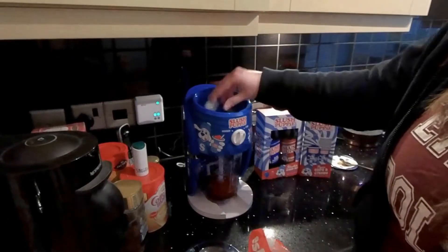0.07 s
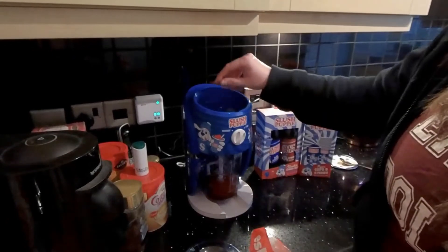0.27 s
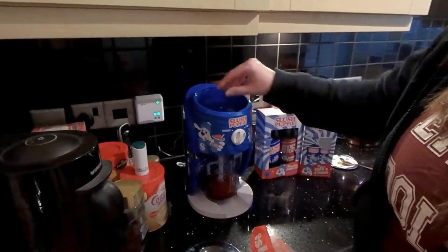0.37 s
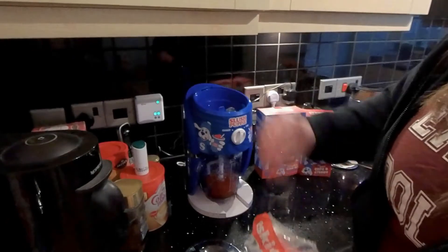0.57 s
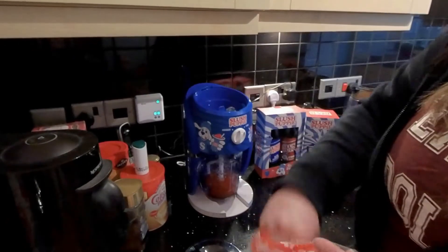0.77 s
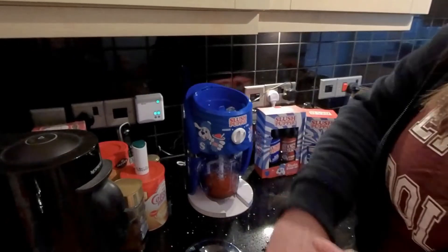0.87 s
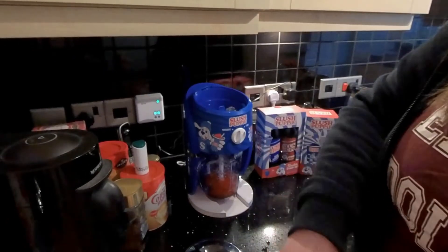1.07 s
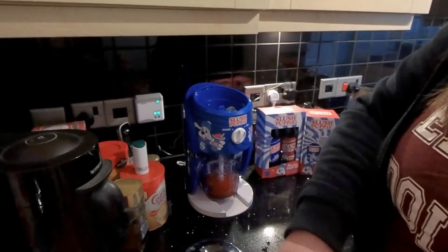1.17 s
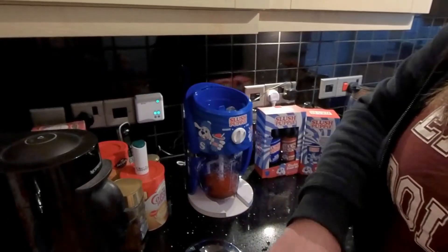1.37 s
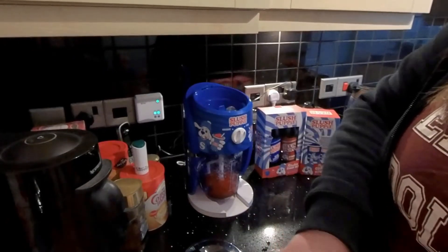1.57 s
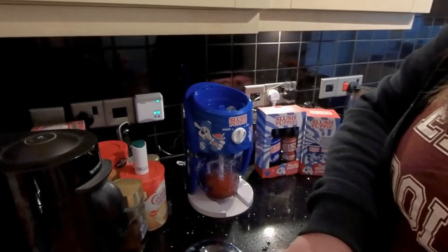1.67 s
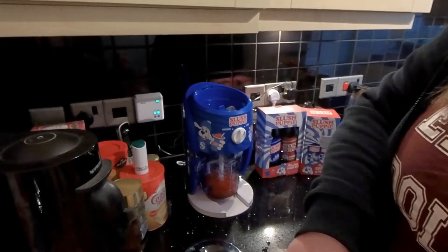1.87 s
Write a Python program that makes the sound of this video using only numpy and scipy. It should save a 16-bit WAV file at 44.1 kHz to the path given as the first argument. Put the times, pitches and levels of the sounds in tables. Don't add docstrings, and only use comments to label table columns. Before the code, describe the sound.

Ice: faint finger ticks, one loud hard rattling drop into a plastic slush maker, a brief near-silence, then crinkly bag rustle with cubes grinding and snapping over dull counter thumps, heard close in a small reflective kitchen.

```python
import sys
import numpy as np
from scipy import signal
from scipy.fft import rfft, irfft, next_fast_len
from scipy.io import wavfile

SR = 44100
rng = np.random.default_rng(int(sys.argv[2]) if len(sys.argv) > 2 else 0)


def master(y):
    cut = np.clip(np.atleast_2d(y).T, -1, 1)
    pcm = np.round(cut * 32767)
    wavfile.write(sys.argv[1], SR, pcm.astype(np.int16))


def elevation(decibels):
    levels = np.asarray(decibels, float)
    return 10 ** (levels / 20)


N = 83790
TIME_S = np.arange(N) / SR
EDGES_HZ = 40 * 2 ** np.arange(0, 9.2, .5)

# start_s, effort_db, cube_weight_db
DIG = [(0.70, -58.5, -64), (0.781, -73.5, -20), (0.79, -57, -19), (0.828, -81, -6.5), (0.847, -45.5, -7),
       (0.905, -42.5, -19), (0.973, -43, -17), (1.002, -41, -12.5), (1.323, -43, -14.5), (1.35, -57, -22),
       (1.376, -38.5, -17), (1.412, -52.5, -7.5), (1.52, -51.5, -14), (1.63, -44.5, -6.5),
       (1.70, -48, -20.5), (1.799, -59.5, -23), (1.864, -42, -6.5), (1.9, -45.5, -9)]
# pitch_hz, level_db, t60_s
WORKTOP = [(194.2, -4, 0.05), (234, -4.5, 0.033), (313, -8.5, 0.013), (350, -3, 0.039), (705, -9, 0.071),
           (864, -6.5, 0.025)]


def rms_one(x):
    return x / np.sqrt(np.mean(x ** 2) + 1e-30)


def at_hz(points, hz):
    point_hz, value = np.transpose(points)
    return np.interp(np.log(hz), np.log(point_hz), value)


def colour(x, points, power=1):
    size = next_fast_len(x.shape[-1] + SR // 10)
    hz = np.maximum(np.fft.rfftfreq(size, 1 / SR), 1)
    spectrum = rfft(x, size) * elevation(power * at_hz(points, hz))
    return irfft(spectrum, size)[..., :x.shape[-1]]


def drift(rate_hz):
    r = np.exp(-80 * np.pi * rate_hz / SR)
    slow = signal.lfilter([1], [1, -2 * r, r * r], rng.standard_normal(N // 40 + 2002))
    slow = rms_one(slow[2000:])
    return np.interp(np.arange(N) / 40, np.arange(len(slow)), slow)


def band(x, k):
    sos = signal.butter(2, EDGES_HZ[k:k + 2], "band", fs=SR, output="sos")
    return signal.sosfilt(sos, x), np.sqrt(EDGES_HZ[k] * EDGES_HZ[k + 1])


def clicks(start_s, gains):
    out = np.full(N, 1e-18)
    index = np.minimum((np.asarray(start_s) * SR).astype(int), N - 1)
    np.add.at(out, index, gains)
    return out


def ring(x, hz, t60_s):
    r, w = elevation(-60 / (t60_s * SR)), 2 * np.pi * hz / SR
    return signal.lfilter([0, np.sin(w)], [1, -2 * r * np.cos(w), r * r], x)


def bursts(start_s, level_db, t60_s, spectrum):
    rise_s, grit_db = .001, 0.5
    envelope = signal.lfilter([1], [1, -elevation(-60 / (t60_s * SR))], clicks(start_s, elevation(level_db)))
    r = np.exp(-1 / (rise_s * SR))
    envelope = signal.lfilter([1 - r], [1, -r], envelope)
    grit = rng.standard_normal(N) * elevation(grit_db * drift(180))
    return envelope * rms_one(colour(grit, spectrum))


def place(x, pan, wet_db, lag_s):
    # pitch_hz, t60_s
    kitchen = [(100, 0.17), (300, 0.19), (750, 0.33), (1400, 0.29), (2100, 0.35), (5000, 0.41),
               (12000, 0.25)]
    # pitch_hz, likeness (-1 to 1)
    likeness = [(100, .1), (500, .6), (2000, .1), (4500, -.4), (9000, .5)]
    first_echo_s, build_s = 0.00046, 0.00092
    t = np.arange(int(.7 * SR)) / SR
    white = rng.standard_normal((2, 2, len(t)))
    tail = 0
    for k in range(len(EDGES_HZ) - 1):
        (mid, side), hz = band(white[k % 2], k)
        alike = np.clip(at_hz(likeness, hz), -.95, .95)
        pair = np.sqrt(1 + alike) * mid + np.sqrt(1 - alike) * side * [[1], [-1]]
        tail = tail + elevation(-60 * t / at_hz(kitchen, hz)) * pair
    tail = tail * (1 - np.exp(-np.maximum(t - first_echo_s, 0) / build_s))
    tail *= elevation(wet_db) / np.sqrt(np.sum(tail ** 2) / 2)
    left, right = x + signal.fftconvolve(x[None], tail, axes=1)[:, :N]
    right = np.pad(right, (round(lag_s * SR), 0))[:N]
    return np.array([colour(left, pan, power=.5), colour(right, pan, power=-.5)])


def room_floor():
    # pitch_hz, level_db per Hz
    floor_spectrum = [(60, -35.5), (185, 15.5), (250, -2.5), (340, 0), (492, -14.5), (903, -4),
                      (1250, -13.5), (6140, 0), (16000, -38)]
    hiss = rng.standard_normal((2, N)) + 0.58 * rng.standard_normal(N)
    return elevation(-79) * rms_one(colour(hiss, floor_spectrum))


def ticks():
    # start_s, peak_db
    touches = [(0.0559, -74), (0.107, -39), (0.1105, -47.5), (0.1192, -47), (0.6013, -49.5), (0.683, -75),
               (0.695, -64), (0.704, -51.5), (0.712, -55), (0.724, -46), (0.7354, -58), (0.748, -58)]
    # pitch_hz, level_db per Hz
    tick_spectrum = [(800, -55.5), (1070, -21), (1500, -51.5), (2150, -22), (2500, -32), (3800, -2.5),
                     (5180, -17), (7000, -5), (16000, -27.5)]
    start_s, peak_db = np.transpose(touches)
    return bursts(start_s, peak_db - 8, 0.08, tick_spectrum)


def cube(bounces):
    # pitch_hz, level_db, t60_s
    hopper_modes = [(296, -8, 0.14), (446, -7.5, 0.051), (642, -2, 0.09), (714, -5.5, 0.081),
                    (825, -1, 0.036), (930.5, -9, 0.1995), (1052, -0.5, 0.03), (1150, -9, 0.07),
                    (1228, -8.5, 0.052), (1412, -3.5, 0.032), (1696, -6, 0.017), (2065, 0, .1),
                    (2297, -2, 0.082), (2460, -4.5, 0.15)]
    # pitch_hz, level_db per Hz
    crack_spectrum = [(880, -30.5), (1500, -2.5), (2400, -7), (4000, -4), (6200, -13), (8200, -9),
                      (11500, -16), (16000, -30.5)]
    skid_s, focus_db_per_octave, strike_spread_db = 0.0006, 7, 2.5
    longest_ring_cycles, crack_t60_s = 85, 0.065
    start_s, knock_db, crack_db, focus_hz = np.transpose(bounces)
    luck = rng.standard_normal((len(start_s), len(hopper_modes), 2))
    t = np.arange(400) / SR
    fade = np.exp(-t / skid_s)
    knock = 0
    for k, (hz, level_db, t60_s) in enumerate(hopper_modes):
        skid = rng.standard_normal(len(t)) * fade + 2 * fade * np.sin(2 * np.pi * hz * t)
        skid /= abs(np.sum(skid * np.exp(2j * np.pi * hz * t)))
        strike_db = knock_db + level_db - 12.0 + strike_spread_db * luck[:, k, 0]
        strike_db = strike_db - focus_db_per_octave * abs(np.log2(focus_hz / hz))
        strikes = clicks(start_s, np.sign(luck[:, k, 1]) * elevation(strike_db))
        push = signal.fftconvolve(strikes, skid)[:N]
        knock = knock + ring(push, hz, min(t60_s, longest_ring_cycles / hz))
    return knock + bursts(start_s, crack_db - 10, crack_t60_s, crack_spectrum)


def film():
    # pitch_hz, level_db per Hz
    film_spectrum = [(240, -29.5), (450, -5), (710, -4.5), (1100, -4.5), (1550, -12.5), (2200, -8.5),
                     (5600, -11), (8300, -10), (16000, -20.5)]
    grains_per_s, grain_spread_db, clump_db, patch_db = 1500, 4, 3, 1.3
    cubes_top_hz, cubes_db, film_db = 1870, 6.5, -2.5
    start_s, effort_db, weight_db = np.transpose(DIG)
    effort_db = np.interp(TIME_S, start_s, effort_db, left=-120)
    weight = elevation(cubes_db + np.interp(TIME_S, start_s, weight_db))
    sizes = elevation(grain_spread_db * np.minimum(rng.exponential(1, (2, N)), 5))
    sizes = sizes * rng.choice([-1, 1], (2, N))
    born = rng.random((2, N)) < grains_per_s * elevation(clump_db * drift(30)) / SR
    grains = sizes * born + 1e-18
    crackle = 0
    for k in range(6, len(EDGES_HZ) - 1):
        patches = elevation(patch_db * drift(22.8))
        crackle = crackle + rms_one(band(grains[k % 2], k)[0]) * 2 ** (k / 4) * patches
    crackle = rms_one(colour(crackle, film_spectrum))
    cubes = signal.sosfilt(signal.butter(4, cubes_top_hz, "low", fs=SR, output="sos"), crackle)
    plastic = signal.sosfilt(signal.butter(4, cubes_top_hz, "high", fs=SR, output="sos"), crackle)
    return elevation(effort_db + film_db) * (plastic + weight * cubes)


def rumble():
    rumble_db, patch_db, weight_follow = -14.5, 4, 1.67
    start_s, effort_db, weight_db = np.transpose(DIG)
    drive_db = np.interp(TIME_S, start_s, effort_db + weight_follow * weight_db, left=-120)
    drive = elevation(rumble_db + drive_db)
    out = 0
    for hz, level_db, t60_s in WORKTOP:
        push = drive * elevation(patch_db * drift(29.76)) * rng.standard_normal(N)
        out = out + elevation(level_db) * ring(push, hz, t60_s)
    return out


def thumps():
    # start_s, peak_db, pitch_hz
    pushes = [(0.756, -41.5, 191), (0.76, -49, 350), (0.849, -42.5, 345), (0.993, -41, 414),
              (1.037, -36.5, 350), (1.108, -38, 317), (1.139, -36.5, 358), (1.169, -39, 312),
              (1.207, -45, 212), (1.276, -30.5, 224), (1.309, -71, 210.3), (1.402, -38, 189),
              (1.467, -38.5, 183), (1.534, -40, 350), (1.606, -31, 296), (1.635, -38, 202),
              (1.73, -53, 207), (1.779, -51.5, 207), (1.851, -23, 226), (1.871, -40, 221), (1.89, -29, 208)]
    thump_db, focus_db_per_octave = -4.5, 11.5
    start_s, peak_db, pitch_hz = np.transpose(pushes)
    out = 0
    for hz, level_db, t60_s in WORKTOP[:4]:
        octaves_off = np.minimum(abs(np.log2(pitch_hz / hz)), 1)
        push_db = peak_db + thump_db + level_db - focus_db_per_octave * octaves_off
        push = clicks(start_s - .004, elevation(push_db))
        swell = ring(ring(push, hz, t60_s), hz, t60_s)
        out = out + swell * 2 * np.e * np.log(1000) / (t60_s * SR)
    return out


def snaps():
    # start_s, peak_db, pitch_hz, t60_s
    cube_snaps = [(0.789, -28, 6240, 0.035), (0.798, -43.5, 1000, 0.048), (0.819, -38.5, 1154, 0.017),
                  (0.84, -23, 4400, 0.034), (0.849, -29, 890, 0.022), (0.853, -27, 7600, 0.021),
                  (0.877, -27.5, 1250, .04), (0.925, -21, 8200, 0.032), (0.926, -21, 3150, 0.033),
                  (0.933, -35, 8500, 0.027), (0.983, -23.5, 6000, .04), (1.006, -22.5, 1260, 0.043),
                  (1.011, -17, 4100, 0.029), (1.023, -38, 5340, 0.024), (1.039, -26, 7800, 0.033),
                  (1.057, -32, 4000, 0.043), (1.091, -18.5, 9500, 0.028), (1.096, -21, 10000, 0.02),
                  (1.102, -18, 8300, 0.018), (1.151, -27.5, 9350, .06), (1.2, -29, 7900, 0.024),
                  (1.22, -24.5, 7700, 0.037), (1.225, -33, 7700, 0.023), (1.253, -21.5, 10500, .03),
                  (1.273, -25.5, 7900, 0.042), (1.283, -28, 2480, 0.048), (1.303, -29.5, 7000, .04),
                  (1.366, -28, 7000, 0.018), (1.369, -20.5, 10000, 0.026), (1.377, -36, 11000, 0.03),
                  (1.428, -29, 860, 0.025), (1.539, -33, 1000, 0.014), (1.606, -35, 917, 0.08),
                  (1.624, -24, 2130, 0.034), (1.644, -34, 766, 0.043), (1.671, -25.5, 2240, 0.027),
                  (1.678, -27, 4580, 0.025), (1.733, -30.5, 1510, 0.025), (1.78, -37.5, 1010, 0.027),
                  (1.829, -30.5, 8840, 0.033), (1.85, -29.5, 705, 0.022), (1.852, -26, 3550, 0.035),
                  (1.868, -23.5, 2000, 0.033), (1.868, -24.5, 8100, 0.027)]
    grit, snap_db, half_width_octaves, rise_s = 0.66, -10.5, 0.58, 0.002
    out = np.zeros(N + SR)
    t = np.arange(int(.1 * SR)) / SR
    shape = (len(cube_snaps), len(t))
    noise = rng.standard_normal(shape) * np.exp(grit * rng.standard_normal(shape))
    for (start_s, peak_db, hz, t60_s), row in zip(cube_snaps, noise):
        edges = [hz * 2 ** -half_width_octaves, min(hz * 2 ** half_width_octaves, 15000)]
        burst = rms_one(signal.lfilter(*signal.butter(2, edges, "band", fs=SR), row))
        envelope = (1 - np.exp(-t / rise_s)) * elevation(peak_db + snap_db - 60 * t / t60_s)
        i = int(start_s * SR)
        out[i:i + len(t)] += burst * envelope
    return out[:N]


def shaded(pair):
    shade_hz, width_hz = 4240, 1300
    r = np.exp(-np.pi * width_hz / SR)
    a = [1, -2 * r * np.cos(2 * np.pi * shade_hz / SR), r * r]
    return np.array([signal.lfilter(a[::-1], a, pair[0]), pair[1]])


def scene():
    # start_s, knock_db, crack_db, focus_hz
    hits = [(.2282, 0, -12.5, 960), (.232, -3.5, -11.5, 1010), (.238, -6.5, -19, 1083),
            (.243, -12.5, -8, 1570), (.248, -7, -12, 704), (.254, -7.5, -9, 662), (.260, -11.5, -26.5, 864),
            (.266, -5, -4, 2050), (.271, -12, -13, 2200), (.276, -14, -8.5, 2300), (.286, -17.5, -23, 2050),
            (.292, -22.5, -19.5, 2450), (.304, -21.5, -25.5, 2500), (.323, -21.5, -26, 987),
            (.335, -13.5, -21, 1015), (.339, -10.5, -19.5, 2195), (.343, -10, -14, 1965),
            (.347, -10.5, -18.5, 1000), (.353, -16, -26.5, 938), (.365, -29, -33, 993),
            (.378, -24, -25, 900), (.388, -25.5, -28, 1030), (.402, -45, -24.5, 910), (.424, -43, -36, 950)]
    # pitch_hz, level_db
    hopper_pan = [(125, -6), (500, -14), (1500, -11), (4000, -2), (8000, -7), (13000, -2.5)]
    # pitch_hz, level_db
    bag_pan = [(60, -3.5), (380, -7.5), (2380, -2.0), (15000, -3)]
    hush = room_floor()
    hopper = 0
    for k in range(3):
        hopper = hopper + place(cube(hits[k::3]), hopper_pan, -4, 0)
    fingers = place(ticks(), bag_pan, -15, 0)
    bag = place(film() + snaps(), bag_pan, -0.5, .00011)
    worktop = place(thumps() + rumble(), bag_pan, -4.5, 0)
    return shaded(hopper + fingers) + bag + worktop + hush


def low_pass(x):
    return signal.sosfilt(signal.butter(12, 16880, fs=SR, output="sos"), x)


def record(dry):
    gate_db, gate_ratio, gate_hz = -79, 0.16, 13
    cut = signal.sosfilt(signal.butter(4, 190, "high", fs=SR, output="sos"), dry)
    cut = signal.sosfilt(signal.cheby2(12, 60, 16500, fs=SR, output="sos"), cut)
    power = signal.lfilter(*signal.butter(1, gate_hz, fs=SR), np.mean(cut ** 2, axis=0))
    level_db = 10 * np.log10(abs(power) + 1e-12)
    gate = elevation(gate_ratio * np.clip(level_db - gate_db, -20, 0))
    rounded = 0.87 * np.tanh(cut * gate / 0.8)
    mix = signal.sosfilt(signal.butter(2, 120, "high", fs=SR, output="sos"), rounded)
    return low_pass(mix)


dry = scene()
out = record(dry)
master(out)
```